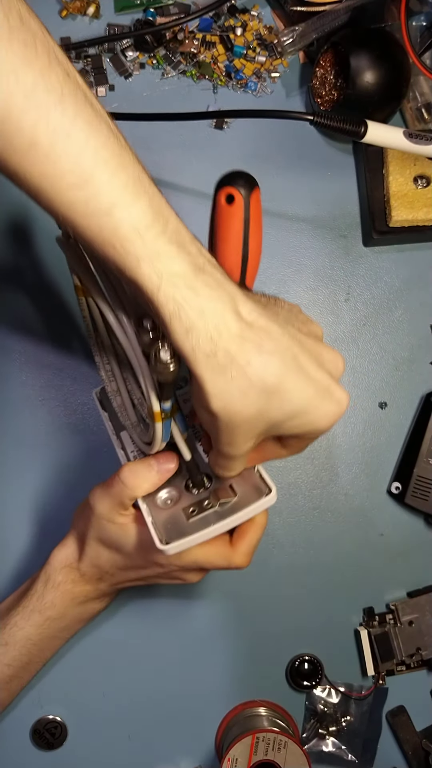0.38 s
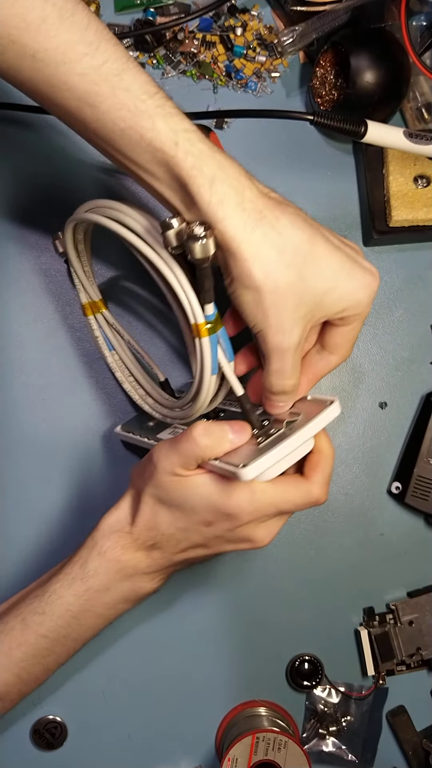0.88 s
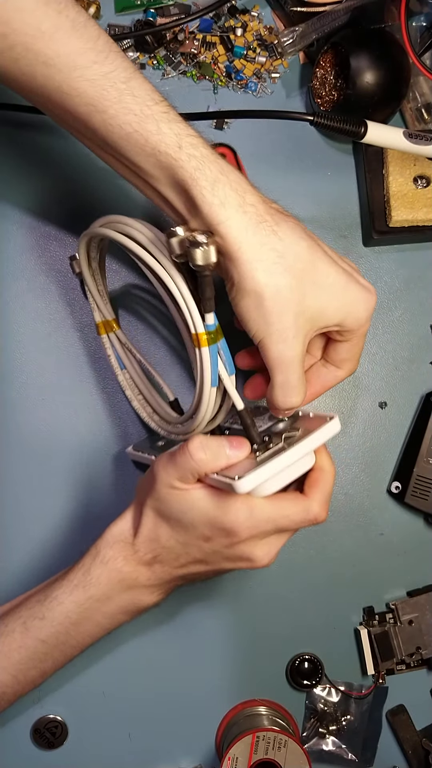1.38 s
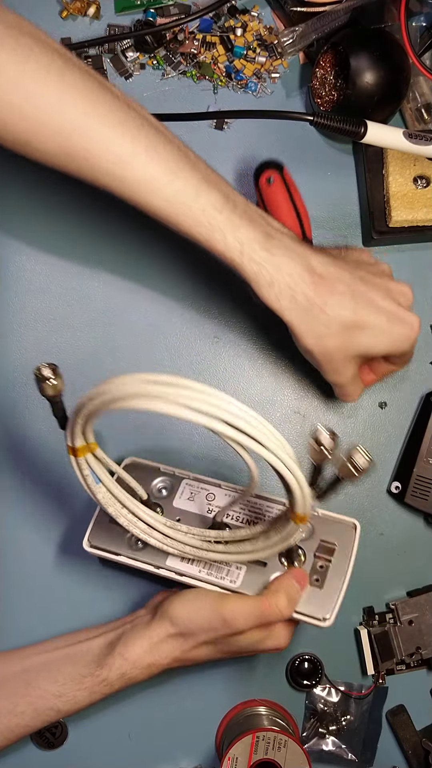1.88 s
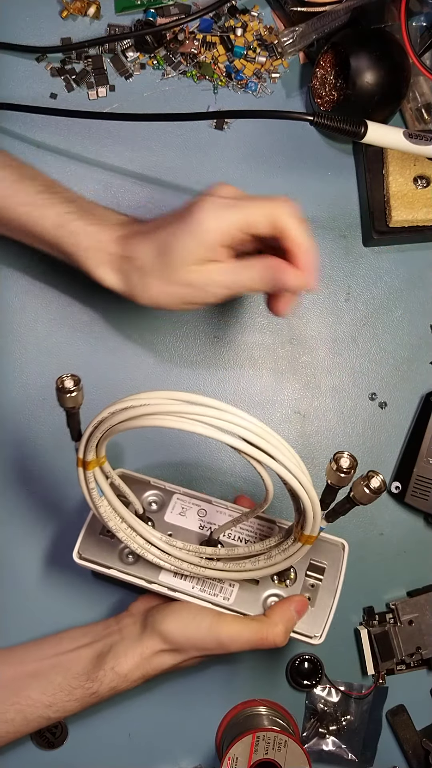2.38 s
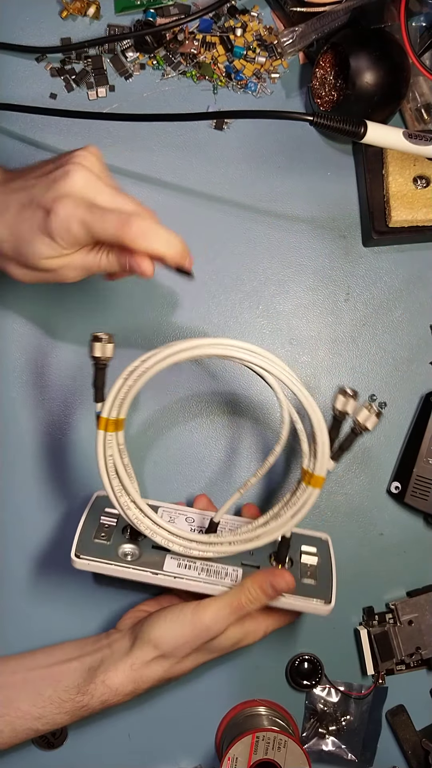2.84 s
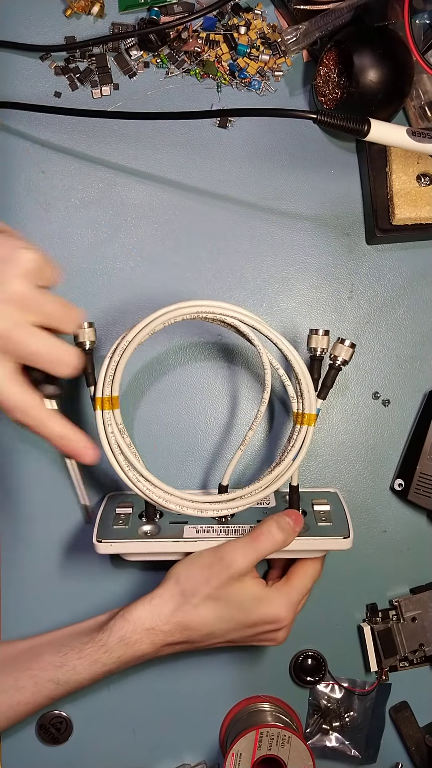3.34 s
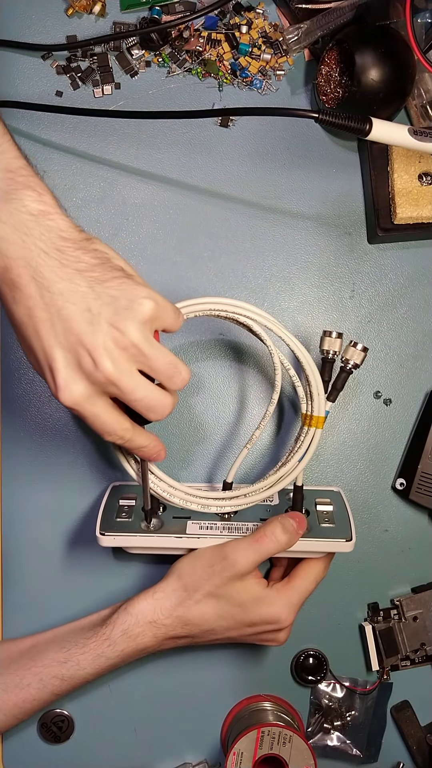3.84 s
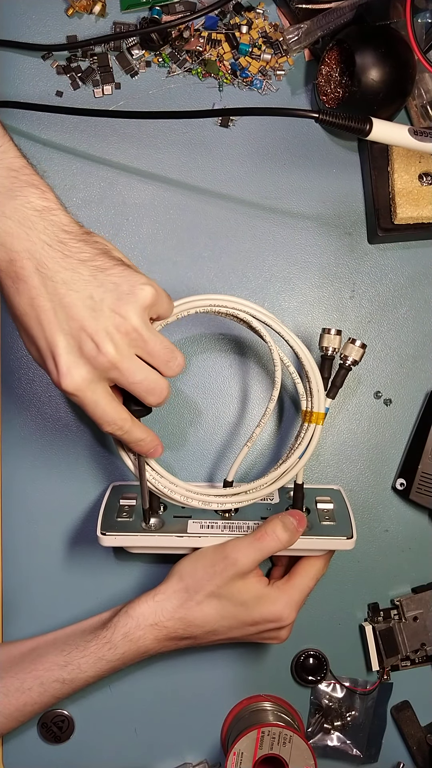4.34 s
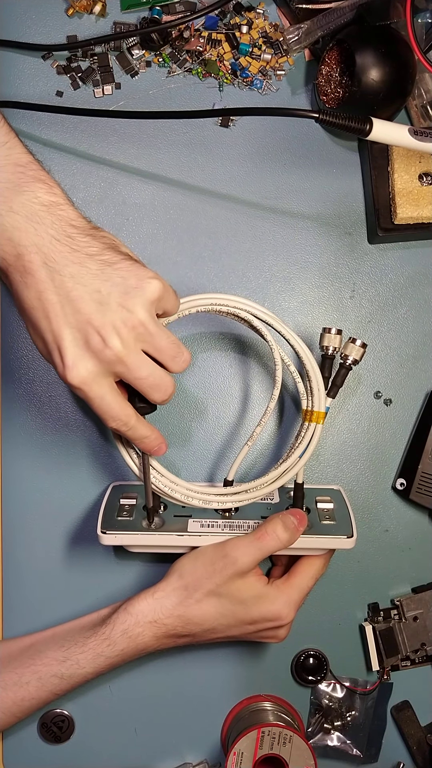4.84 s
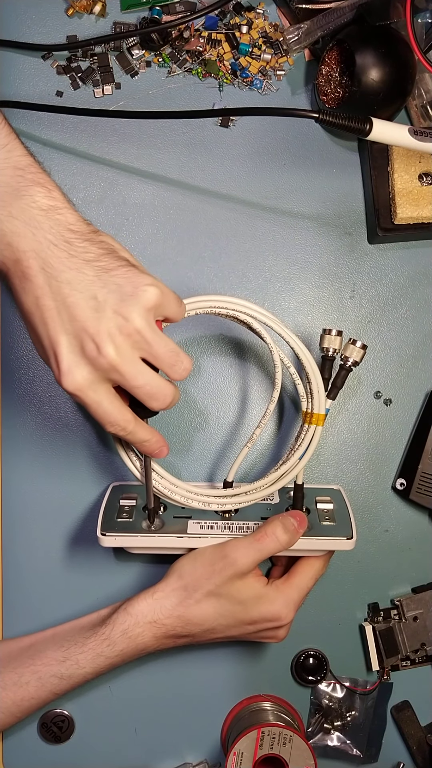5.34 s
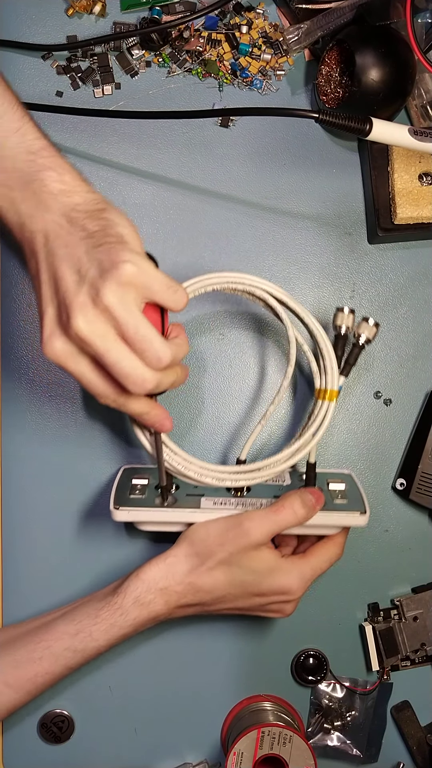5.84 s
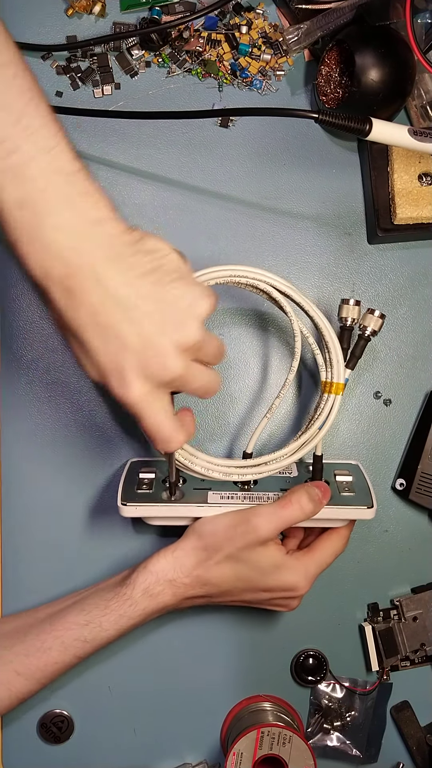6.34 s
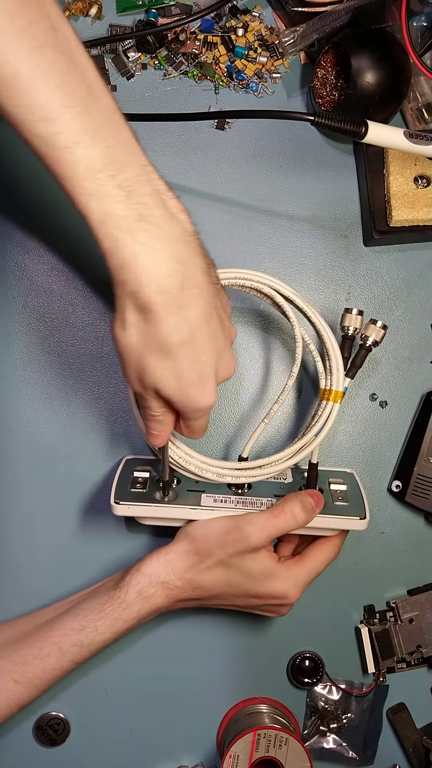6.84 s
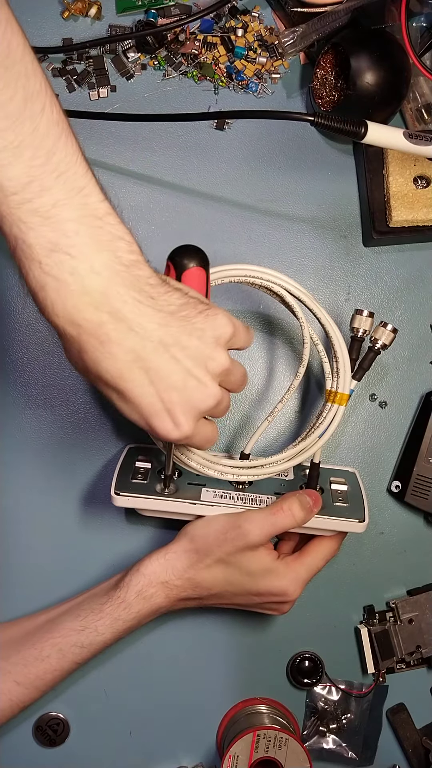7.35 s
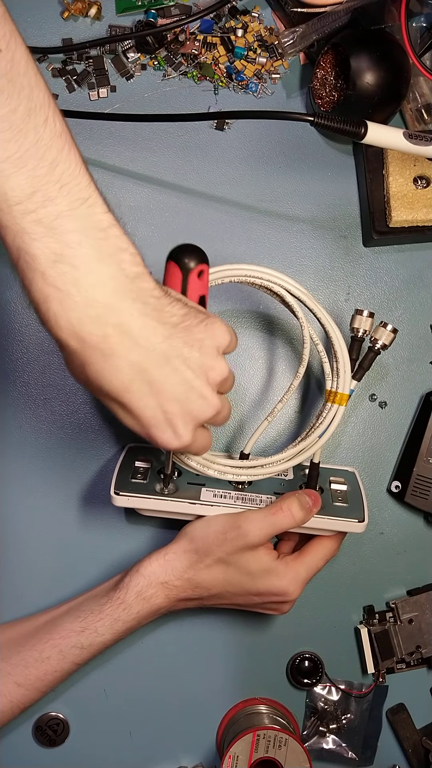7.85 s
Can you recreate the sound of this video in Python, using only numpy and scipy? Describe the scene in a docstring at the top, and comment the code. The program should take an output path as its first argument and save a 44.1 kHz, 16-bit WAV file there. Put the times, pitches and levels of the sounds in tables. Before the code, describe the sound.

Close to the microphone in a small room with faint steady noise, hands rub and shift a hollow plastic housing. Light clicks and grainy scratches fill the first half second; a faint falling squeak comes near 0.8, then a sharp metallic click at 1.1. Scraping swells around 1.5-1.8 with a dull bump. A loud plastic knock lands at 2.3, softer handling follows, and another hard clack with a bench thud and tiny steel ping comes at 3.1. A bright double click sounds at 4.0, then a thin, quiet squeak rises and falls from 4.2 to 4.5. Separate clicks follow at 4.8, 5.1 and 5.5. From 5.7 to 6.4 there are rubs and knocks, then scuffs, small rattles and pings near 6.8. The strongest dry scrape swells at 7.0-7.4, leaving soft rubbing and slight scuffs around 8.1.

```python
"""A plastic housing is handled and unscrewed on a mat-covered workbench in a small room.
From the start there is steady room noise and restless rubbing: tiny slips drive plastic, metal and bench.
Knocks and clicks soon join: short chatter makes the parts ring, and noise echoes carry on their energy.
Then come soft scuffs, strokes in which some range stands out, dull bumps and a faint falling squeak.
Later the steel shaft pings, and a thin squeak with a high partner rises and falls: gliding sines."""
import sys
import numpy as np
from scipy import signal
from scipy.fft import rfft, irfft
from scipy.io import wavfile
from scipy.ndimage import uniform_filter1d

SR = 44100
rng = np.random.default_rng(int(sys.argv[2]) if len(sys.argv) > 2 else 0)


def field_ratio(decibels):
    """Amplitude ratio for a level in dB (20 dB per decade); scalars and array-likes work."""
    return 10 ** (np.asarray(decibels, dtype=float) / 20)


def waveform_to_disk(signal):
    """Save audio, clipped to [-1, 1], as 16-bit WAV at the path in sys.argv[1]."""
    frames = np.transpose(np.atleast_2d(signal))
    scaled = np.clip(frames, -1, 1) * 32767
    samples = np.round(scaled).astype(np.int16)
    wavfile.write(sys.argv[1], SR, samples)


N = 362061


def rms_one(x):
    """Scales a sound to an rms (average strength) of 1."""
    return x / np.sqrt(np.mean(x ** 2) + 1e-30)


def at_hz(points, hz):
    """Reads a table on a log-frequency axis."""
    table_hz, values = np.transpose(points)
    return np.interp(np.log(hz), np.log(table_hz), values)


def band(x, low_hz, high_hz):
    """Keeps the range between two frequencies (Butterworth band-pass)."""
    return signal.sosfilt(signal.butter(2, [low_hz, high_hz], "band", fs=SR, output="sos"), x + 1e-18)


def ring(x, hz, width_hz):
    """A resonance: a unit click starts a dying sine of height 1; a wider one dies sooner."""
    r = np.exp(-np.pi * width_hz / SR)
    w = 2 * np.pi * hz / SR
    return signal.lfilter([0, np.sin(w)], [1, -2 * r * np.cos(w), r * r], x + 1e-18)


def drift(rate_hz):
    """Slow random wandering with an rms of 1."""
    r = np.exp(-2 * np.pi * rate_hz / SR)
    wander = signal.lfilter([1], [1, -2 * r, r * r], rng.standard_normal(N + SR))
    return rms_one(wander[SR:])   # the first second only settles the filter


def swell(start, length, peak_at, sharpness):
    """A stroke grows to 1 at a share of its length, then fades."""
    done = np.clip((np.arange(N) / SR - start) / length, 0, 1)
    return np.sin(np.pi * done ** (np.log(0.5) / np.log(peak_at))).clip(0) ** sharpness


def strike(s, level_db, contact_ms, modes, span, mode_spread_db):
    """Each contact builds up, chatters for a few ms and drives every mode with a strength of its own."""
    low_hz, high_hz, broad_db, _ = span
    age = np.arange(SR // 5)
    chance = rng.standard_normal((len(s), len(age) + len(modes)))
    phase = age / (contact_ms * SR / 1000)
    chatter = chance[:, len(modes):] * phase * np.exp(-phase)
    modes_total = np.sqrt(sum(field_ratio(db) ** 2 for _, _, db in modes))
    blow = chatter * field_ratio(broad_db) * modes_total * 300 / np.sqrt(high_hz - low_hz)
    for k, (hz, width_hz, db) in enumerate(modes):
        blow = blow + field_ratio(db + mode_spread_db * chance[:, [k]]) * ring(chatter, hz, width_hz)
    blow = band(band(blow, low_hz, high_hz), low_hz, high_hz)
    # the loudest 9 ms get an rms of half the given level
    loudest = np.sqrt(uniform_filter1d(blow ** 2, size=400).max(axis=1))
    blow = blow * (field_ratio(level_db) / loudest / 2)[:, None]
    where = np.round(s * SR).astype(int)[:, None] + age
    return np.bincount(where.ravel(), blow.ravel(), N + SR)[:N]


# colour of the room noise: f/Hz, relative level/dB
AIR_COLOUR = [(15, -25.5), (25, 3), (64, 12), (277, -7), (560, -1.5), (641, -7), (796, -17.5), (988, 3),
              (2000, -17.5), (4370, -7.5), (8140, -33.5), (8830, -32.5), (10100, -26.5), (11000, -32.5),
              (16000, -31)]


def air(level_db=-72):
    """Steady room tone: noise shaped to a fixed spectrum."""
    hz = np.maximum(np.arange(N // 2 + 1) * SR / N, 1)
    spectrum = rfft(rng.standard_normal(N)) * field_ratio(at_hz(AIR_COLOUR, hz))
    return field_ratio(level_db) * rms_one(irfft(spectrum, N))


def slips(grain_per_s=2300.0, grain_db=1.5, slip_db=2.0):
    """Dense tiny slips of uneven size and random sign, with some noise, wavering in strength."""
    sizes = field_ratio(grain_db * np.minimum(rng.exponential(1, N), 5)) * rng.choice([-1, 1], N)
    grains = rms_one(sizes * (rng.random(N) < grain_per_s / SR))
    return (grains + 0.8 * rng.standard_normal(N)) * field_ratio(slip_db * drift(22.0))


# rubbing strokes: start t/s, length t/s, housing level/dB, scratch level/dB, skin hiss level/dB
RUB_STROKES = [(0.042, 0.29, -62.5, -57.5, -77), (0.309, 0.24, -52, -53.5, -75),
               (0.504, 0.19, -68, -63.5, -76), (0.608, 0.23, -61, -54, -76), (0.837, 0.15, -70, -62, -78),
               (1.057, 0.19, -65, -51.5, -84.5), (1.48, 0.39, -58.5, -54.5, -68),
               (1.87, 0.24, -61, -68.5, -84), (2.226, 0.28, -54.5, -58, -77.5),
               (2.46, 0.36, -63.5, -60, -69), (2.837, 0.14, -67, -78, -84), (3.07, 0.28, -56.5, -55, -69.5),
               (3.243, 0.26, -70, -68, -75), (3.527, 0.14, -65.5, -69, -77),
               (3.834, 0.37, -62.5, -64, -77.5), (4.15, 0.23, -73.5, -83.5, -89),
               (5.5, 0.13, -66, -63, -89.5), (5.734, 0.31, -59.5, -62, -72), (6.018, 0.21, -55, -58.5, -77),
               (6.2, 0.16, -57, -68, -85), (6.497, 0.18, -58.5, -55, -79), (6.742, 0.24, -51.5, -51.5, -73),
               (6.894, 0.22, -53.5, -53, -71), (7.014, 0.4, -55, -46, -59.5),
               (7.298, 0.18, -62.5, -59, -66), (7.622, 0.32, -65.5, -68, -84.5)]
# hands never lie still: level/dB of bench, hollow, shell, scratch, bright scratch, skin hiss
RESTING_LEVELS = [-76, -75, -74.5, -74, -81, -90]
# how much the hands fidget between strokes: t/s, level/dB re resting
FIDGETING = [(0, 4.5), (0.5, 1), (1.051, 4), (1.3, 1), (1.5, 6.5), (2.2, 2), (2.6, 4.5), (3.4, 4.5),
             (3.7, 1.5), (4.4, 2), (4.6, -0.5), (5.7, 1), (6.0, 4.5), (6.7, 4.5), (7.0, 0), (7.5, 0),
             (8.21, 0.5)]


def stroke_gains(bench_db=-14.5, hollow_db=-7, bright_db=-9):
    """Gain of each body in time: the resting hands plus all strokes, added as power."""
    start, length, housing_db, scratch_db, hiss_db = np.transpose(RUB_STROKES)
    # bench and hollow are set relative to the housing, the bright scratch relative to the scratch
    db = np.array([housing_db + bench_db, housing_db + hollow_db, housing_db,
                   scratch_db, scratch_db + bright_db, hiss_db])
    swells = np.array([swell(s, d, 0.5, 1.93) for s, d in zip(start, length)])
    fidget_db = np.interp(np.arange(N) / SR, *np.transpose(FIDGETING))
    resting = field_ratio(np.array(RESTING_LEVELS)[:, None] + fidget_db)
    return np.sqrt(resting ** 2 + field_ratio(db) ** 2 @ swells ** 2)


# resonances of the bench top, the hollow housing, its shell, the metal parts, their bright edge
# and the top fizz, each: f/Hz, width f/Hz, relative level/dB
BENCH_MODES = [(79, 11, -7.5), (132.3, 12, 2.5), (180.4, 11, -4)]
HOLLOW_MODES = [(305.6, 84, -13.5), (472, 56, -2.5), (571, 31, 1.5), (643, 78, 4.5)]
SHELL_MODES = [(859, 32, 0), (945, 33, 4), (1010, 11, -7.5), (1070, 16, -12.5), (1316, 150, 4.5),
               (1302.5, 40, -0.5), (1494, 570, 8), (1840, 100, -8), (2015, 150, -4.5)]
METAL_MODES = [(2704, 100, 12), (3027, 600, -3), (3400, 150, -16), (3764, 397, 30), (3770, 89, -6),
               (4300, 250, -22.5), (4230, 120, -6.5)]
BRIGHT_MODES = [(5150, 150, 1), (5790, 130, -9.5), (6380, 260, -9), (7070, 140, -6), (7620, 340, -11.5),
                (8195, 290, 1.5)]
TOP_MODES = [(10300, 2400, 6.5), (11300, 2300, -1), (11700, 590, -17.5)]
# ranges these bodies and, last, the steel shaft fill:
# low f/Hz, high f/Hz, broad part relative level/dB when hit, the same when rubbed
BODY_RANGES = [(60, 337, -6, 1.5), (278, 682, -10.5, 1), (827, 2960, -9, -8), (2310, 5280, -14, 3.5),
               (5000, 8500, 0.5, 12), (9100, 12400, 6.5, -1.5), (13000, 14200, -10, -15.0)]
BENCH_RANGE, HOLLOW_RANGE, SHELL_RANGE, METAL_RANGE, BRIGHT_RANGE, TOP_RANGE, SHAFT_RANGE = BODY_RANGES


def rubbing(slipping):
    """Fingers and tool rub: the tiny slips drive the resonances and broad range of every body."""
    bodies = [BENCH_MODES, HOLLOW_MODES, SHELL_MODES, METAL_MODES, BRIGHT_MODES, TOP_MODES]
    out = 0
    for modes, (low_hz, high_hz, _, broad_db), gain in zip(bodies, BODY_RANGES, stroke_gains()):
        rings = sum(field_ratio(db) * np.sqrt(width_hz) * ring(slipping, hz, width_hz) for hz, width_hz, db in modes)
        broad = rms_one(band(slipping, low_hz, high_hz))
        body = rms_one(rings) + field_ratio(broad_db) * broad
        out = out + gain * rms_one(band(body, low_hz, high_hz))
    return out


def contacts(rows, slowness, crest_db=2.5):
    """One contact drives housing and metal together; each range builds up at its own pace."""
    s, shell_db, hollow_db, tick_db, bright_db = np.transpose(rows)
    # the top fizz follows the bright edge, more so for bright contacts
    fizz_db = tick_db + (1 + 0.38) * bright_db - 8.5
    metal = strike(s, tick_db, 1.2 * slowness, METAL_MODES, METAL_RANGE, 0.83)
    hollow = strike(s, shell_db + hollow_db, 1.6 * slowness, HOLLOW_MODES, HOLLOW_RANGE, 3.5)
    shell = strike(s, shell_db, 1.4 * slowness, SHELL_MODES, SHELL_RANGE, 3.0)
    edge = strike(s, tick_db + bright_db, 1.2 * slowness, BRIGHT_MODES, BRIGHT_RANGE, 1.4)
    fizz = strike(s, fizz_db, 1.5 * slowness, TOP_MODES, TOP_RANGE, 3.4)
    return shell + field_ratio(crest_db) * (metal + hollow + edge + fizz)


SCUFF_SLOWNESS = 5.8   # contact time re a contact of slowness 1
# knocks and clicks: t/s, shell level/dB, hollow ring level/dB re shell,
# metal tick level/dB, bright edge level/dB re the tick
KNOCK_ROWS = [(0.081, -50, -9, -39, -28), (0.108, -50.5, -8, -34.5, -8.5), (0.185, -50.5, 1, -53, -2),
              (0.198, -59, -13, -47.5, 3.5), (0.252, -42.5, -8.5, -37.5, -4.5), (0.263, -51, -14, -58, 0),
              (0.306, -50, -10, -48, 1.5), (0.352, -40.5, -13, -32.5, 7.5), (0.372, -36, -3, -39, -2),
              (0.69, -49.5, -28, -36.5, 4), (0.801, -52, -9, -47, -4), (0.812, -64, -8, -45, -7),
              (0.856, -61, 1, -61, 7.5), (1.045, -66, -12, -58.5, 8), (1.1, -28.5, -20, -25, 5),
              (1.872, -49, -15, -57.5, -4), (1.94, -51, -2.5, -68, -7), (1.971, -44.5, -18, -65, -10),
              (2.035, -63, 6, -49.5, -17), (2.067, -55, -7, -57, -15), (2.097, -59.5, -5, -51.5, -13),
              (2.257, -15, -8, -27, -10), (2.458, -33, -29, -42.5, -17), (2.544, -46.5, -3.5, -54, -15),
              (2.744, -58, -7, -48, -17), (3.065, -19, -2, -23, -9), (3.097, -42, -20, -34.5, -5.5),
              (3.198, -40.5, -18, -36, -6), (3.254, -49, -21, -45, -4.5), (3.567, -44.5, -13, -50.5, -12),
              (3.624, -50.5, -7.5, -65, -16), (3.689, -52, -22.5, -67, -5),
              (3.755, -43.5, -3.5, -50.5, -17), (3.849, -50.5, -9, -59, -4), (3.96, -19, -13.5, -19, -12),
              (4.004, -22, -10, -16.5, -2.5), (4.095, -46.5, -8.5, -43, -9),
              (4.189, -51, -8.5, -61.5, -15.5), (4.534, -55.5, -20, -60, -22), (4.837, -25, -15, -23, -8.5),
              (5.136, -25, -17.5, -32.5, -14.5), (5.19, -49, -18, -67, -12), (5.335, -59, -3.5, -71, -8),
              (5.374, -57, -3.5, -74, -8), (5.498, -21, -7.5, -20.5, -9), (5.73, -29, -10.5, -37, -15.5),
              (5.744, -38, -4.5, -41.5, -14), (6.11, -40, -11, -39, -5.5), (6.12, -44, -2.5, -32.5, -6),
              (6.16, -31.5, -9.5, -47.5, -16), (6.342, -26.5, -15, -35.5, -16),
              (6.751, -54, -1, -54, -14.5), (6.776, -38, -2.5, -44.5, -15), (6.818, -36, -7.5, -34, -12),
              (6.88, -56, -13, -36, -4.5), (7.005, -40, -17, -39.5, -12)]


def knocks(lead_s=0.014, lead_db=-31):
    """Parts knock and the bit clicks; a faint, soft build-up of noise comes 14 ms before each."""
    lead_ins = np.array(KNOCK_ROWS) + [-lead_s, lead_db, 0, lead_db, 0]
    return contacts(KNOCK_ROWS, 0.98) + contacts(lead_ins, SCUFF_SLOWNESS)


# how long the echoes take to fall by 60 dB: f/Hz, decay t/s
ECHO_DECAY = [(100, 0.063), (500, 0.18), (1500, 0.26), (4000, 0.21), (10000, .16)]


def room(x, flutter_db=1.2):
    """Dense echoes from bench, shelves and walls: in each band, noise carries the dying energy."""
    white = rng.standard_normal((2, N))
    edges = 80 * 2 ** np.arange(0, 7.7, 0.28)
    out = 0
    for k, (low_hz, high_hz) in enumerate(zip(edges, edges[1:])):
        decay_s = at_hz(ECHO_DECAY, np.sqrt(low_hz * high_hz))
        r = field_ratio(-120 / (decay_s * SR))   # for energy, so twice the 60 dB
        energy = signal.lfilter([1 - r], [1, -r], band(x, low_hz, high_hz) ** 2 + 1e-24)
        out = out + np.sqrt(energy) * rms_one(band(white[k % 2], low_hz, high_hz))
    return out * field_ratio(flutter_db * drift(32.0))


# soft, grainy scuffs: t/s, shell level/dB, hollow ring level/dB re shell,
# metal tick level/dB, bright edge level/dB re the tick
SCUFF_ROWS = [(0.411, -40, -7, -41.5, -6.5), (2.415, -42, -28, -48, -23), (2.458, -57, -23, -49.5, -22),
              (2.85, -54.5, 4, -67, 3), (2.894, -50, -3.5, -56, -13), (3.184, -40, -20, -40.5, -8),
              (4.47, -42, -21.5, -51, -8.5), (6.044, -46, -8, -61.5, -2), (6.49, -53, -10, -61, -5),
              (6.534, -42.5, -0.5, -38, -21), (6.814, -43.5, -6, -34.5, -3), (6.842, -41.5, -1, -33, -9),
              (6.994, -64, 4, -52.5, -4), (7.06, -40.5, -6, -41, -24), (8.132, -45, -1, -47, -16),
              (8.165, -51.5, -7, -50.5, -12)]


def scuffs():
    """The same bodies as for knocks, driven by a longer chatter."""
    return contacts(SCUFF_ROWS, SCUFF_SLOWNESS)


# ranges, narrow as a tone or wide as skin hiss, that stand out during one stroke:
# start t/s, length t/s, f/Hz, width f/Hz, level/dB
STROKE_RANGES = [(0.503, 0.082, 945, 80, -69), (0.495, 0.18, 11700, 1800, -73.5),
                 (0.636, 0.16, 2000, 350, -51), (0.695, 0.08, 1570, 120, -52.5),
                 (0.937, 0.086, 1950, 150, -62), (1.524, 0.26, 5150, 348, -54),
                 (1.524, 0.33, 1580, 610, -53.5), (1.575, 0.21, 2960, 600, -54),
                 (1.63, 0.15, 1010, 147, -54.5), (1.563, 0.25, 9820, 700, -64.5),
                 (2.051, 0.091, 2800, 450, -60), (2.41, 0.19, 1280, 150, -60), (2.59, 0.28, 2680, 250, -63),
                 (3.18, 0.13, 945, 60, -59), (3.75, 0.28, 1110, 249, -59.5), (3.82, 0.15, 2680, 200, -64),
                 (5.78, 0.2, 1120, 493, -56.5), (5.781, 0.2, 4200, 278, -56),
                 (5.82, 0.15, 2880, 250, -60.5), (6.45, 0.1, 11300, 2500, -65),
                 (7.047, 0.35, 8300, 250, -57.5), (7.05, 0.5, 3270, 600, -75), (7.1, 0.18, 5630, 497, -66),
                 (7.09, 0.37, 14300, 2500, -64), (7.227, 0.11, 1090, 251, -52.5),
                 (7.374, 0.093, 1160, 248, -61.5), (7.778, 0.15, 11600, 1870, -70.5),
                 (7.798, .12, 1010, 300, -64)]


def stroke_ranges(slipping):
    """In some strokes one range of the slips, narrow or wide, stands out, swelling and fading."""
    out = 0
    for start, length, hz, width_hz, db in STROKE_RANGES:
        part = rms_one(band(slipping, hz - width_hz / 2, hz + width_hz / 2))
        out = out + field_ratio(db) * swell(start, length, 0.48, 1) * part
    return out


# mean faint tick: shell level/dB, hollow level/dB re shell, tick level/dB, bright edge level/dB re tick
FAINT_LEVELS = [-68, 2, -63.5, -15]


def faint_ticks(per_s=1.5, spread_db=3.0):
    """Faint contacts at random moments, each with levels of its own."""
    chance = rng.random((40, 5))
    s = np.cumsum(-np.log(chance[:, 0]) / per_s)
    levels = np.array(FAINT_LEVELS) + spread_db * (2 * chance[:, 1:] - 1)
    return contacts(np.column_stack([s, levels])[s < N / SR], 1)


# dull bumps of the bench top: t/s, level/dB, contact t/ms
BENCH_BUMPS = [(0.7, -54, 15), (1.1, -53, 8), (1.714, -44, 15), (2.258, -32, 0.58), (2.535, -42.5, 10.5),
               (2.627, -51, 5), (2.742, -58, 3.6), (3.065, -21, 0.55), (3.195, -45.5, 2), (3.963, -55, .8),
               (4.001, -46, 2.6), (4.838, -56.5, .8), (5.135, -50, 2.8), (5.499, -42, 0.72),
               (5.89, -47.5, 9.3), (6.537, -51.5, 3.5), (6.772, -44, 2.7), (6.824, -49, 4.9)]


def bumps():
    """Contacts set the low resonances of the bench top ringing."""
    s, level_db, contact_ms = np.transpose(BENCH_BUMPS)
    return strike(s, level_db, contact_ms[:, None], BENCH_MODES, BENCH_RANGE, 2.1)


# a faint falling squeak: t/s, f/Hz, level/dB
EARLY_SQUEAK = [(0.76, 4300, -74), (0.81, 4140, -67), (0.865, 3850, -66)]
# a thin squeak as the screw starts to turn, and its high partner: t/s, f/Hz, level/dB
SCREW_SQUEAK = [(4.19, 3599, -74), (4.208, 3808, -60), (4.234, 3932, -60), (4.258, 4070, -70.5),
                (4.366, 4040, -71), (4.402, 3905, -59), (4.474, 3540, -63), (4.534, 3380, -59),
                (4.55, 3363, -77)]
HIGH_SQUEAK = [(4.236, 12050, -89), (4.27, 12600, -82), (4.32, 12820, -75), (4.36, 13100, -78),
               (4.406, 12800, -75), (4.45, 12220, -75), (4.485, 11300, -78)]


def squeak(rows, waver_db=2.5):
    """A near sine whose pitch glides from point to point and whose level wavers."""
    s, hz, db = np.transpose(rows)
    t = np.arange(N) / SR
    edges = np.clip(np.minimum(t - s[0], s[-1] - t) / 0.012, 0, 1)
    glide_hz = uniform_filter1d(np.interp(t, s, hz), size=1500)
    tone = np.sqrt(2) * np.sin(2 * np.pi * np.cumsum(glide_hz) / SR)
    return edges * field_ratio(np.interp(t, s, db) + waver_db * drift(30.7)) * tone


# resonances of the steel shaft: f/Hz, width f/Hz, relative level/dB
SHAFT_MODES = [(13850, 120, 4), (14500, 100, 12), (14800, 120, 6)]
# when the shaft pings: t/s, level/dB
SHAFT_PINGS = [(3.0749, -40), (6.1125, -42), (6.122, -46), (6.8214, -36), (6.8474, -51), (6.8788, -53)]


def pings():
    """Short contacts set the very high resonances of the steel shaft ringing."""
    s, level_db = np.transpose(SHAFT_PINGS)
    return strike(s, level_db, 1.2, SHAFT_MODES, SHAFT_RANGE, 2.0)


def scene():
    """All layers together, alike in both channels but for the highest treble."""
    hits = knocks() + scuffs() + faint_ticks() + bumps() + pings()
    slipping = slips()
    mid = hits + field_ratio(-5) * room(hits) + rubbing(slipping) + stroke_ranges(slipping)
    mid = mid + squeak(EARLY_SQUEAK) + squeak(SCREW_SQUEAK) + squeak(HIGH_SQUEAK)
    # an inverted bounce off a nearby surface ripples the treble
    echo_ms, echo_db, echo_hz = 1.6, -17.5, 2270
    bounce = np.roll(band(mid, echo_hz, 12000), round(echo_ms * SR / 1000))
    mid = mid - field_ratio(echo_db) * bounce + air()
    # the highest treble, delayed, is added left and subtracted right
    side_hz, side_db, side_lag_ms = 12300, -3, 0.7
    side = mid
    for _ in range(3):   # three passes make the band steep
        side = band(side, side_hz, 17500)
    side = field_ratio(side_db) * np.roll(side, round(side_lag_ms * SR / 1000))
    return np.array([mid + side, mid - side])


def top_cut(x):
    """Nothing passes above the cut-off."""
    return signal.sosfilt(signal.butter(12, 16500, fs=SR, output="sos"), x)


# colour of the microphone and its nearby surfaces, on every sound: f/Hz, width f/Hz, level/dB
MIC_PEAKS = [(945, 89, 5), (1300, 40, -2), (2240, 310, -5), (3734, 380, -4), (4200, 58, 1.5),
             (5150, 83, -1.5), (7140, 400, -4), (8670, 83, 9), (8600, 880, -1.5), (10300, 270, 3.5)]


def record(dry):
    """Peaks and dips of the microphone, then a steep cut of the top."""
    for hz, width_hz, db in MIC_PEAKS:
        w, a, g = 2 * np.pi * hz / SR, np.pi * width_hz / SR, field_ratio(db / 2)
        boosted = [1 + a * g, -2 * np.cos(w), 1 - a * g]
        dry = signal.lfilter(boosted, [1 + a / g, -2 * np.cos(w), 1 - a / g], dry)
    mix = signal.sosfilt(signal.cheby2(12, 60, 16100, fs=SR, output="sos"), dry)
    return top_cut(mix)


dry = scene()
out = record(dry)
waveform_to_disk(out)
```